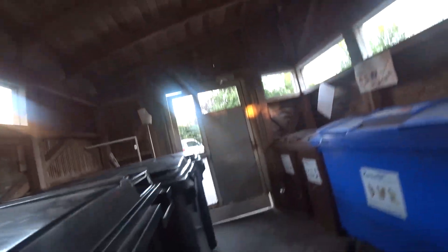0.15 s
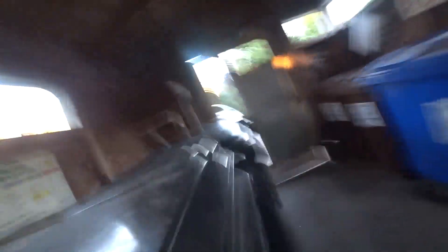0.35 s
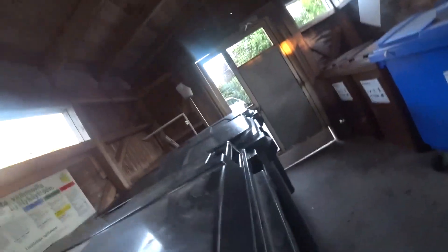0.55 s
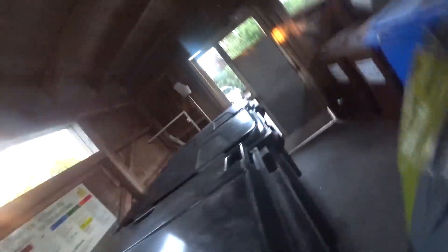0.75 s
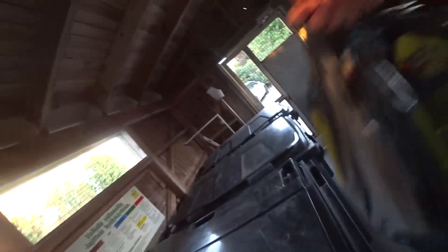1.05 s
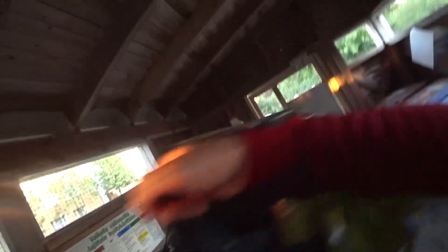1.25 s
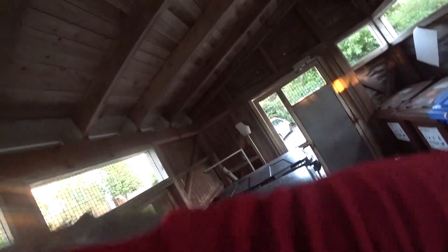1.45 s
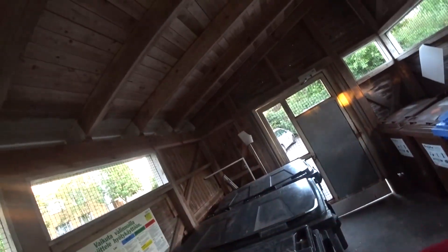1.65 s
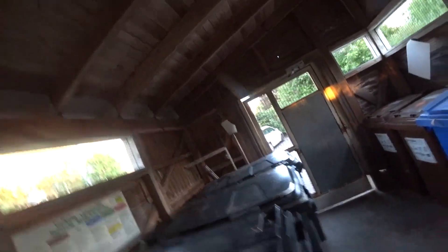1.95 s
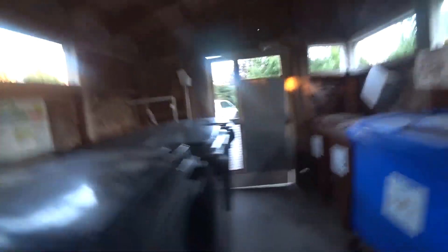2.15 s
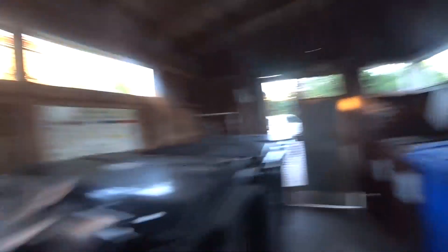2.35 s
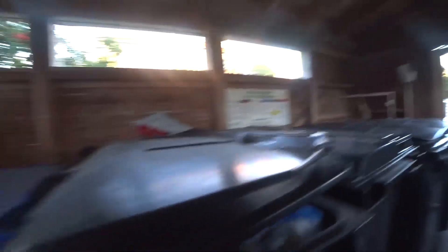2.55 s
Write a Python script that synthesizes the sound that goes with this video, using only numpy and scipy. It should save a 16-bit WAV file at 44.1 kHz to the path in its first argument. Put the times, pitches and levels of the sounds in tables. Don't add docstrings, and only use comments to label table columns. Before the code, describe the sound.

A rubbish bag falls into a plastic wheelie bin, close up in a small wooden shed. Faint hinge squeaks and light rattles open; a catch clicks near 0.57 s. Clothing rubs and soft low thumps hit the microphone from 0.4 to 1.2 s as film rustles. From 1.7 to 2.3 s contents crackle and knock hollowly; the lid bangs at 2.4 and 2.5 s, rattling away.

```python
import sys
import numpy as np
from scipy import signal
from scipy.fft import rfft, irfft, next_fast_len
from scipy.io import wavfile
from scipy.ndimage import uniform_filter1d, map_coordinates

SR = 44100
rng = np.random.default_rng(int(sys.argv[2]) if len(sys.argv) > 2 else 0)


def boost_factor(decibels):
    exponent = np.asarray(decibels, float) / 20
    return 10 ** exponent


def unload_wav(signal):
    wavfile.write(
        sys.argv[1],
        SR,
        np.round(np.clip(np.atleast_2d(signal).T, -1, 1) * 32767).astype(np.int16),
    )


N = 119070
T = np.arange(N) / SR
HALVES = np.array([[.5], [-.5]])
APART_DB = -15.5


def unit(x):
    return x / np.sqrt(np.mean(x ** 2) + 1e-20)


def along(points, hz):
    point_hz, values = np.transpose(points)
    return np.interp(np.log(hz + 1), np.log(point_hz + 1), values)


def curves(rows):
    seconds, *columns = np.transpose(rows)
    return [np.interp(T, seconds, column) for column in columns]


def wobble(rate):
    knots = rng.standard_normal(int(N * rate / SR) + 4)
    return map_coordinates(knots, [T * rate])


def filtered(x, response):
    m = next_fast_len(N + SR // 2)
    return irfft(rfft(x, m) * response(np.fft.rfftfreq(m, 1 / SR)), m)[..., :N]


def coloured(x, points):
    below = (points[0][0] / 2, points[0][1] - 30)
    above = (points[-1][0] * 2, points[-1][1] - 30)
    closed = [below] + list(points) + [above]
    return unit(filtered(x, lambda hz: boost_factor(along(closed, hz))))


def grit(spread_db, rate, patchy_db):
    size = boost_factor(spread_db * 2 * np.tanh(np.abs(wobble(rate)) / 2))
    z = signal.stft(size * rng.standard_normal((2, N)), nperseg=256)[2]
    field = uniform_filter1d(rng.standard_normal(z.shape[1:]), size=5, axis=0)
    field = uniform_filter1d(field, size=16, axis=1)
    trains = signal.istft(z * boost_factor(patchy_db * unit(field)), nperseg=256)[1][:, :N]
    return trains * boost_factor([[0], [APART_DB]])


def burst(s, db, hold, t60):
    t = T - s
    attack = np.clip(t / .003, 0, 1)
    return attack * boost_factor(db - 60 * np.clip(t - hold, 0, 9) / t60)


def ring(s, db, hz, t60, attack=0.002):
    out, first = np.zeros(N), int(s * SR) + 1
    t = T[first:first + int(2 * t60 * SR)] - s
    envelope = boost_factor(db - 60 * t / t60) * (1 - np.exp(-t / attack))
    out[first:first + len(t)] = envelope * np.sin(2 * np.pi * hz * t)
    return out


# frequency in Hz, level in dB.
AIR = [(30, 9.5), (100, -10), (500, -10), (2500, -18), (10000, -45)]


def outside_air():
    air, side = boost_factor(-52.5) * coloured(grit(spread_db=6.5, rate=10, patchy_db=5), AIR)
    return np.array([air + side, air - side])


# frequency in Hz, t60 in seconds.
SHED_DECAY = [(200, 1), (2000, 0.27), (10000, 0.056)]


def shed(x):
    out, step = np.zeros((2, N + SR)), SR // 4
    for i in range(0, N, step):
        hz, t, z = signal.stft(rng.standard_normal((2, step)), SR, nperseg=256)
        decay = boost_factor(-60 * t / along(SHED_DECAY, hz)[:, None])
        tail = signal.istft(z * decay, SR, nperseg=256)[1]
        wet = signal.fftconvolve(x[None, i:i + step], tail / np.linalg.norm(tail[0]), axes=1)
        start = i + 200
        out[:, start:start + wet.shape[1]] += wet
    return out[:, :N]


# time in seconds, level in dB.
RUB = [(0, -46), (.38, -52), (.44, -34), (.58, -41.5), (.7, -37), (.78, -35), (.95, -38), (1.1, -39.5),
       (1.3, -43), (1.7, -44.5), (1.85, -40), (2.2, -39), (2.38, -41.5), (2.47, -28.5), (2.7, -37)]
# frequency in Hz, level in dB.
BODY = [(25, -0.5), (90, -7.5), (180, -11.5), (380, -18.5)]
# time in seconds, peak level in dB, pitch in Hz.
THUMPS = [(0.406, -20.5, 159), (0.412, -16, 127), (0.612, -24, 165), (0.766, -26, 64), (0.832, -28, 44.3),
          (0.874, -27.5, 50), (.914, -19, 125), (0.94, -18, 101), (0.952, -18.5, 76.5), (0.971, -14, 164),
          (0.996, -19, 120), (1.003, -21, 89), (1.085, -26.5, 98.5), (1.207, -24.5, 102)]


def camera_body():
    rub_db, = curves(RUB)
    rub_level = boost_factor(rub_db - 4.0 + 4.3 * wobble(30.56))
    out = rub_level * coloured(grit(spread_db=6.5, rate=27, patchy_db=0.0), BODY)
    out[0] += sum(ring(s - .003, db + 8.0, hz, 3.84 / hz, 0.0047) for s, db, hz in THUMPS)
    pair = out[0] + out[1] * np.array([[1], [-1]])
    lead = 0.6
    return filtered(pair, lambda hz: np.exp(1j * lead * (hz > 40) * HALVES))


# frequency in Hz, level in dB, t60 in seconds.
CATCH = [(1345, -2, 0.02), (1940, 4, 0.018), (2470, 3, 0.013), (2630, 4, 0.011), (3510, 10.5, 0.012),
         (3330, -24, 0.15), (3150, -4, 0.017)]


def catch():
    start_s, level_db, attack_s = .5669, -15, .0007
    low_hz, high_hz = 1200, 4000
    click = sum(ring(start_s, level_db + db, hz, t60, attack_s) for hz, db, t60 in CATCH)
    return filtered(click, lambda hz: 1 / (1 + (low_hz / (hz + 1)) ** 8 + (hz / high_hz) ** 12))


# start in seconds, length in seconds, pitch in Hz, glide in Hz, level in dB.
SQUEAKS = [
    (0, .06, 2320, 0, -52),
    (.056, .065, 3630, -30, -53),
    (.12, .065, 6500, -100, -52),
    (.152, .045, 3200, 0, -50),
    (.185, .04, 455, 0, -36),
    (.215, .04, 2400, 100, -52),
    (.262, .075, 2450, 200, -51),
    (.531, .034, 2960, -280, -41),
]


def hinge():
    out = np.zeros(N)
    for s, length, hz, glide, db in SQUEAKS:
        u = np.clip((T - s) / length, 0, 1)
        pitch = hz + glide * u ** 2 + .014 * hz * wobble(300)
        swell = np.sqrt(np.clip(5 * u, 0, 1) * (1 - u))
        out += boost_factor(db + 3 * wobble(120)) * swell * np.sin(2 * np.pi * np.cumsum(pitch) / SR)
    return out


# start in seconds, rms level in dB, hold in seconds, t60 in seconds.
RATTLES = [
    (0.148, -50, 0.033, 0.26),
    (0.4, -34.5, 0.023, 0.31),
    (0.565, -33, 0.0083, 0.074),
    (0.973, -36.5, 0.0079, 0.12),
    (1.473, -37.5, 0.042, 0.046),
    (1.601, -33.5, 0.022, 0.05),
    (2.044, -23, 0.016, 0.13),
    (2.102, -27, 0.0066, 0.03),
    (2.676, -53, 0.005, .05),
    (2.694, -39.5, .02, 0.13),
]
# frequency in Hz, level in dB.
RATTLE = [(200, 5.5), (1450, 0.5), (6500, -8), (11000, -13)]


def rattles():
    return sum(burst(*row) for row in RATTLES) * coloured(grit(spread_db=3.5, rate=500, patchy_db=2.0), RATTLE)


# start in seconds, rms level in dB, hold in seconds, t60 in seconds.
SLAMS = [
    (2.391, -24, 0.031, 0.44),
    (2.504, -26.5, 0.034, 0.49),
]
# frequency in Hz, width in Hz, level in dB.
LID_MODES = [
    [(430, 30, -8), (711, 26, -2), (820, 40, -5), (921, 24, 0), (1500, 50, -16), (1700, 10, -9),
     (2300, 40, -12), (2794, 16, -11), (3095, 35, -7), (3360, 35, -7), (4050, 25, -11), (4460, 50, -9),
     (5670, 35, -11), (6020, 30, -11)],
    [(328, 14, -4), (775, 26, 0), (867, 12, -4), (960, 25, -7), (1160, 25, -8), (1310, 14, -5),
     (1705, 12, -8), (2148, 14, -4), (2310, 25, -7), (2740, 16, -7), (3085, 22, -5), (4060, 35, -7),
     (5555, 25, -8), (6575, 40, -8)],
]
# frequency in Hz, level in dB.
LID_NOISE = [(300, -2.5), (1500, -12.5), (6800, -13.5), (11000, -30.5)]


def lid():
    ring_db, chatter_t60_s = 4, 0.088
    treble_dies = 0.39
    out = np.zeros((2, N))
    for (s, db, hold, t60), modes in zip(SLAMS, LID_MODES):
        chatter = grit(spread_db=4, rate=500, patchy_db=1)

        def panel(hz):
            return sum((-1) ** k * boost_factor(mode_db) * 1j * hz * width / (centre ** 2 - hz ** 2 + 1j * hz * width)
                       for k, (centre, width, mode_db) in enumerate(modes))

        rattle = coloured(chatter, LID_NOISE)
        dull = filtered(rattle, lambda hz: 1 / (1 + (hz / 4800) ** 4))
        out += burst(s, db, hold, t60) * dull
        out += burst(s, db, hold, treble_dies * t60) * (rattle - dull)
        ringing = filtered(burst(s, db, hold, chatter_t60_s) * chatter, panel)
        out += boost_factor(ring_db) * ringing / np.std(filtered(chatter, panel))
    return out


# time in seconds, force in dB, share of heavy lumps from 0 to 1.
TUMBLE = [
    (1.58, -49.5, 0.85),
    (1.76, -27.5, 0.22),
    (1.82, -22, 0.38),
    (1.9, -24.5, 0.53),
    (2.02, -35, 0.84),
    (2.06, -25, 0.58),
    (2.14, -19, 0.46),
    (2.22, -21, 0.36),
    (2.36, -43, 0.7),
]
# frequency in Hz, level in dB.
LIGHT = [(250, -21.5), (750, 0.5), (1400, -3.5), (3000, -8.5), (5000, -18)]
# frequency in Hz, level in dB.
HEAVY = [(100, -2), (220, 3), (320, 2.5), (500, -1), (900, -6)]
# time in seconds, level in
# dB, pitch in Hz.
LUMPS = [(0.151, -31.5, 470), (0.176, -29.5, 397), (0.154, -34, 1360), (0.175, -33, 1033), (.414, -29, 605),
         (.425, -29, 394), (.618, -33.5, 480), (.763, -31, 415), (.771, -31, 1610), (.785, -29, 1143),
         (.797, -33, 365), (1.345, -35.5, 820), (1.508, -22.5, 718), (1.509, -27.5, 1230),
         (1.62, -29.5, 885), (1.701, -22, 311), (1.76, -18, 770), (1.8, -11, 788), (1.826, -12.5, 396),
         (1.847, -8.5, 1850), (1.883, -12.5, 298), (2.047, -13, 727), (2.106, -8.5, 858),
         (2.118, -7.5, 1340), (2.148, -12.5, 263), (2.17, -17.5, 65.5), (2.218, -15.5, 192),
         (2.01, -21.5, 533), (2.07, -12, 907), (2.2, -27, 955), (2.255, -17, 633), (2.393, -16.5, 835),
         (2.42, -13, 683), (2.505, -11.5, 797), (2.52, -17, 1350), (2.54, -15.5, 335.4), (2.69, -28, 846)]


def load():
    force_db, heavy = curves(TUMBLE)
    outside = np.clip(TUMBLE[0][0] - T, 0, 9) + np.clip(T - TUMBLE[-1][0], 0, 9)
    heavy = np.clip(heavy, 0, 1)
    light_part = np.sqrt(1 - heavy) * coloured(grit(spread_db=2.0, rate=280, patchy_db=0.5), LIGHT)
    heavy_part = np.sqrt(heavy) * coloured(grit(spread_db=3, rate=180, patchy_db=3.0), HEAVY)
    out = boost_factor(force_db - 220 * outside) * (light_part + heavy_part)
    for s, db, hz in LUMPS:
        t60 = .045 * np.sqrt(1000 / hz)
        out[0] += ring(s, db, hz, t60, 0.0011)
        out[0] += ring(s, db - 6.5, 1.43 * hz, 0.64 * t60)
    return out


# time in seconds, peak level in dB, centre in Hz.
SNAPS = [(0.118, -34.5, 6500), (0.404, -31, 3130), (0.411, -26, 5770), (.481, -35, 3200), (.513, -34, 7000),
         (0.975, -21.5, 7300), (1.179, -24, 7550), (1.339, -30.5, 4470), (1.364, -30, 8350),
         (1.4361, -24.5, 7000), (1.474, -22, 4430), (1.494, -20, 6200), (1.522, -19, 7000),
         (1.5455, -36, 5000), (1.577, -36, 7040), (1.745, -11, 2800), (1.802, -7, 2400), (1.95, -10, 3300),
         (1.976, -9, 3400), (2.0483, -8, 2870), (2.105, -12.5, 3000), (2.169, -26, 7500),
         (2.192, -12.5, 3160), (2.21, -8, 3380), (2.669, -35, 4880)]


def snaps():
    out = np.zeros(N)
    for s, db, hz in SNAPS:
        out += ring(s, db + 13, hz, .001, .00005)
        out += ring(s + .0002, db + 8, .5 * hz, .0015, .00005)
    roughened = out * (1 + .35 * rng.standard_normal(N))
    return filtered(roughened, lambda hz: hz ** 2 / (hz ** 2 + 1500 ** 2))


# start in seconds, rms level in dB,
# hold in seconds, t60 in seconds.
SLIDES = [
    (1.597, -36.5, 0.035, 0.056),
    (2.061, -25, 0.03, 0.056),
    (2.172, -35, 0.028, .05),
    (2.511, -32, 0.022, .08),
]
# frequency in Hz, level in dB.
SLIDE = [(4500, -4), (7300, 7), (11000, -4)]


def slides():
    return sum(burst(*row) for row in SLIDES) * coloured(grit(spread_db=-1, rate=520, patchy_db=5.5), SLIDE)


# time in seconds, level in dB.
CRUMPLE = [(0, -62.5), (.13, -50.5), (.27, -50), (.38, -59), (.56, -47.5), (.6, -36), (.75, -43.5),
           (.78, -36.5), (.92, -42), (1.05, -36), (1.42, -43), (1.58, -35), (1.65, -32), (1.74, -20.5),
           (1.82, -25), (2.01, -27), (2.21, -26), (2.3, -38)]
# frequency in Hz, level in dB.
FILM = [(400, -3.5), (1400, -4.5), (3000, -8), (7600, -9.5), (11000, -15.5)]


def bag():
    settling_db = 22 * np.clip(T - CRUMPLE[-1][0], 0, 9)
    level_db = curves(CRUMPLE)[0] - settling_db
    film = coloured(grit(spread_db=4.5, rate=1200, patchy_db=1.83), FILM)
    film = boost_factor(level_db - 2.0 + 1.77 * wobble(24.53)) * film
    dull = filtered(film, lambda hz: 1 / (1 + (hz / 2000) ** 4))
    brightens = 0.25
    film += dull * (boost_factor(-brightens * (level_db + 42)) - 1)
    film[0] += snaps()
    return film + slides()


# time in seconds, left-right level difference in dB.
SWING = [
    (0, -1),
    (.6, 3),
    (.95, 2),
    (1.3, -1),
    (1.8, 2),
    (2.15, 2.5),
    (2.7, 0.5),
]
# frequency in Hz, lead in radians.
LEAD = [(100, 0.14), (860, 0.83), (3200, 0.9), (9000, 0.66)]


def scene():
    mid, apart = bag() + load() + lid() + rattles()
    mid = mid + hinge() + catch()
    apart = filtered(apart, lambda hz: np.sqrt(1 + hz / 3000))
    pan_db = curves(SWING)[0] * HALVES
    near = np.array([mid + apart, mid - apart])
    near = filtered(near, lambda hz: np.exp(1j * along(LEAD, hz) * HALVES))
    wet = boost_factor(-12.5) * shed(filtered(mid, lambda hz: hz / (hz + 300)))
    return near * boost_factor(pan_db) + wet + camera_body() + outside_air()


def band_limit(x):
    return signal.sosfilt(signal.butter(12, 12340, fs=SR, output="sos"), x)


def record(dry):
    ceiling, top_hz = .8, 11013
    x = dry / (1 + np.abs(dry / ceiling) ** 4) ** (1 / 4)
    x = filtered(x, lambda hz: np.where(hz < top_hz, 1, boost_factor(-50 - (hz - top_hz) / 140)))
    return band_limit(x)


dry = scene()
out = record(dry)
unload_wav(out)
```